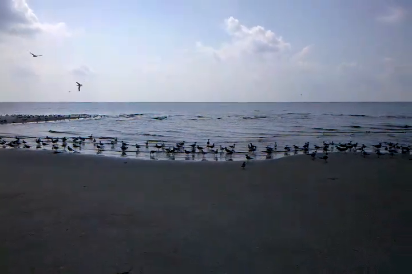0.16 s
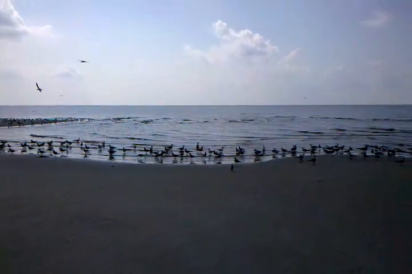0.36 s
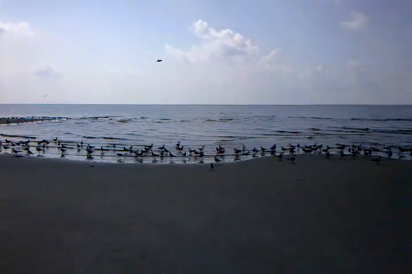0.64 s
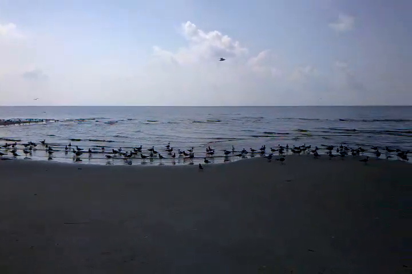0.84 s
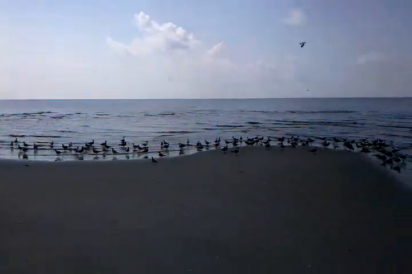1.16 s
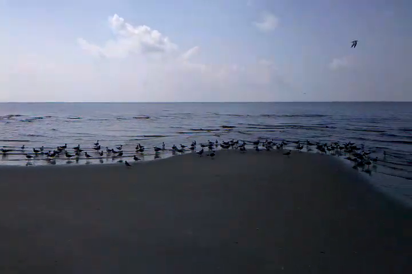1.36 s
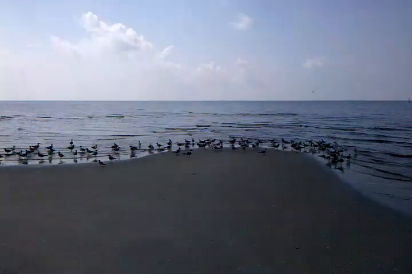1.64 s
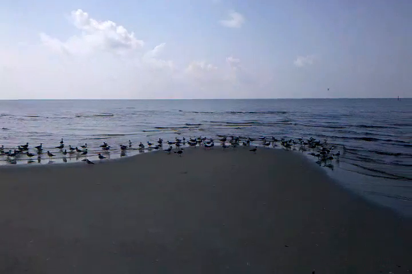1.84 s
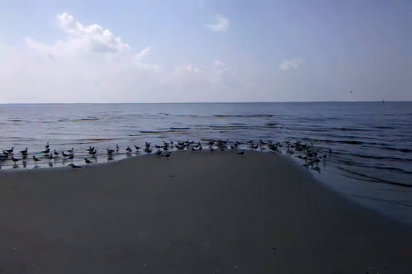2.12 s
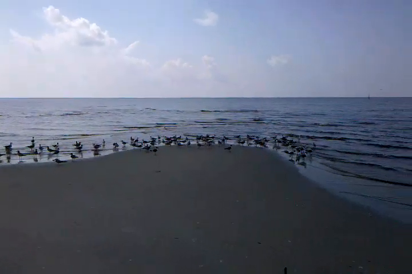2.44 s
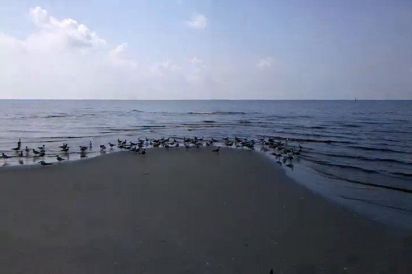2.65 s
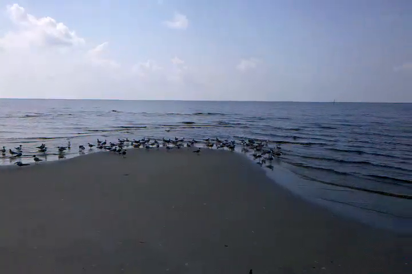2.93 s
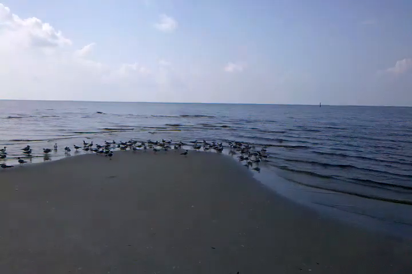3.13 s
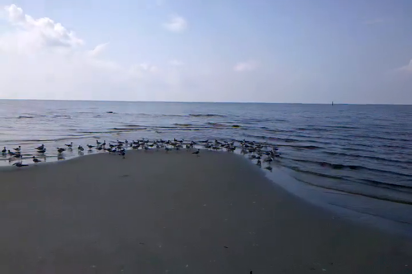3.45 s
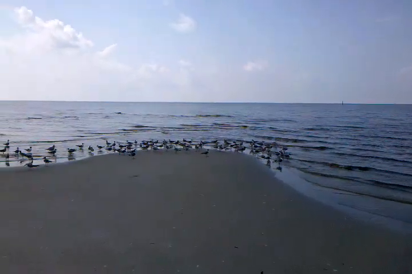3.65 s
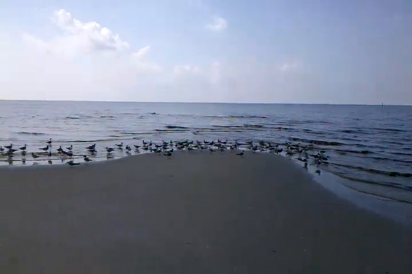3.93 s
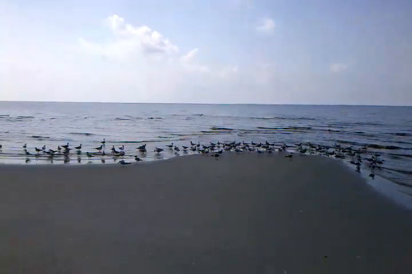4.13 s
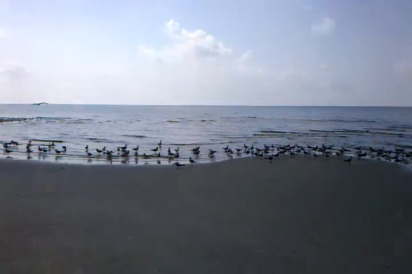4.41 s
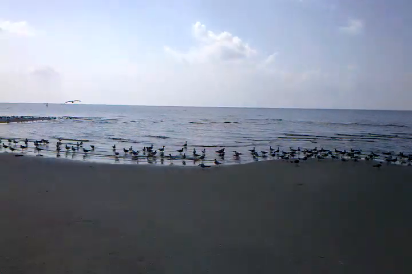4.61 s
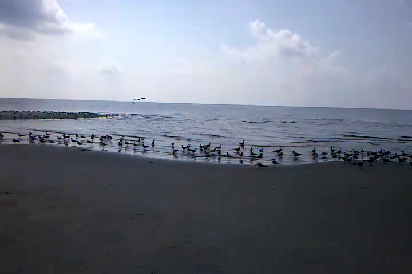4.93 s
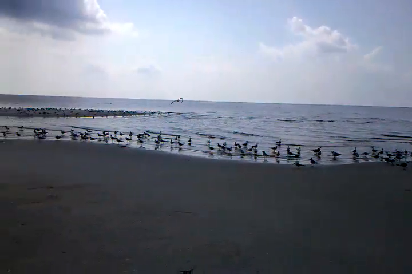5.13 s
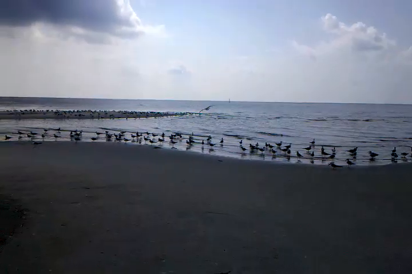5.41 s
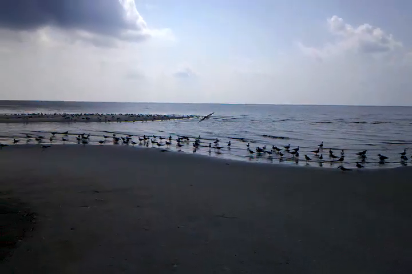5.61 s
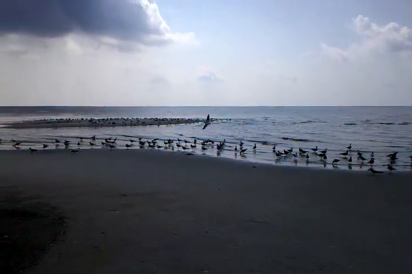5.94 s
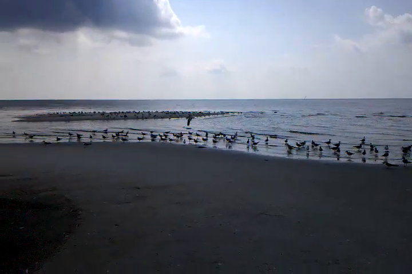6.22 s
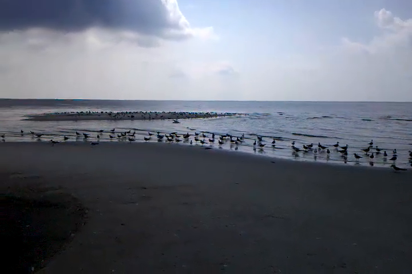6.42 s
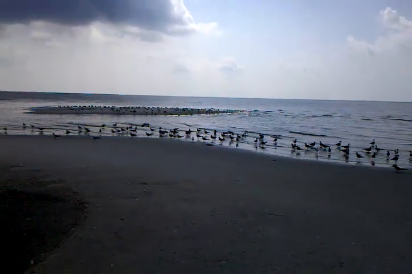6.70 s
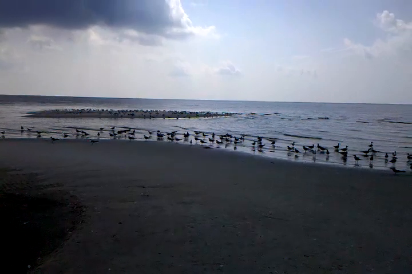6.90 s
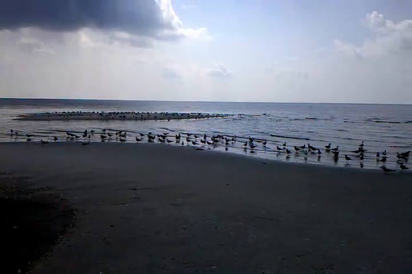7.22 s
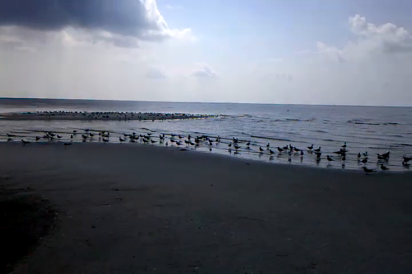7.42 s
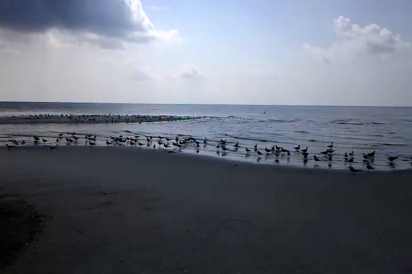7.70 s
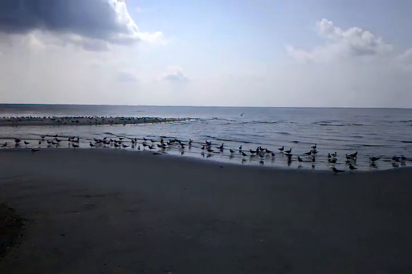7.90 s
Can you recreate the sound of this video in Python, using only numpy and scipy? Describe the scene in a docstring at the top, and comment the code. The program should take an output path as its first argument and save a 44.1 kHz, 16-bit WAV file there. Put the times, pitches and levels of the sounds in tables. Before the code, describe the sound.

Open beach, gulls at the waterline at a modest distance, almost no echo. Small surf hisses softly throughout in flickering bands, with light spray swells near 2.4, 3.9, 4.9 and 7 s. Far birds form a swelling high peeping shimmer. A warbled whistle opens; thin begging whistles that step upward recur roughly every second. Throaty trilled cries come at 1.4, 2.3, 2.7 and, strongly, 3.1 s, with short barks near 2, 3, 4 and 4.4-4.7 s. Dull wind bumps touch the microphone at 1.1-2.3, 3.3 and 4.5-5.2 s. A faint low engine drone, slowly sinking, grows clearer after 4 s. More cries at 4.8 and 5.1 s, then a bright pair at 5.6-5.8 s. From 6 to 7.7 s whistles, peeps and a few barks lead, with a piercing drooping squeak at 7.2 s. At 7.8 s a bark, whistle and loud low-pitched cry crowd together, ending around 8 s.

```python
"""On an open beach, a flock of gulls stands at the waterline, some way from a small camera.
Young birds beg with thin, nearly pure whistles; adults give trilled, throaty cries and short barks,
built from harmonics of a vibrating membrane plus throat-shaped noise, over many short far calls
and a swelling band of noise near 3.9 kHz. Small surf hisses in flickering noise bands, a far boat engine
drones on two harmonics, and a few puffs of wind bump the microphone as short bursts of low noise."""
import sys
import numpy as np
from scipy import signal
from scipy.fft import rfft, irfft, next_fast_len
from scipy.io import wavfile
from scipy.ndimage import uniform_filter1d, map_coordinates

SR = 44100
rng = np.random.default_rng(int(sys.argv[2]) if len(sys.argv) > 2 else 0)


def wrap_up_sound(samples):
    """Save the sound to the file named by the first command line argument, as 16-bit audio."""
    columns = np.atleast_2d(samples).T
    # keep every value between -1 and 1, then stretch to whole-number steps
    tamed = np.clip(columns, -1, 1)
    steps = np.round(tamed * 32767).astype(np.int16)
    wavfile.write(sys.argv[1], SR, steps)


N = 355401


def undb(db):
    """Decibels to amplitude ratio: 20 dB is a factor of ten."""
    return 10 ** (np.asarray(db) / 20)


def unit(x):
    """Normalise to rms 1, so that a later gain sets the level."""
    return x / np.sqrt(np.mean(x ** 2) + 1e-20)


def whole(rows):
    """Linear interpolation of each table column over the whole scene."""
    s, *columns = np.transpose(rows)
    return [np.interp(np.arange(N) / SR, s, c) for c in columns]


def colour(hz, points):
    """Spectral envelope: gain at hz from (hz, db) points, interpolated on a log-frequency axis."""
    f, db = np.transpose(points)
    return undb(np.interp(np.log(hz + 1), np.log(f), db))


def wander(size, rate):
    """Band-limited random modulation: smoothed normal draws, rate of them per second."""
    place = np.arange(size) * rate / SR
    draws = rng.standard_normal(int(place[-1]) + 4)
    return map_coordinates(draws, [place + 1], order=2, mode="nearest")


def noise(size, shape):
    """Filtered white noise of rms 1: its spectrum follows shape(hz)."""
    n = next_fast_len(size)
    spectrum = rfft(rng.standard_normal(n)) * shape(np.arange(n // 2 + 1) * SR / n)
    return unit(irfft(spectrum, n)[:size])


def hump(hz, centre, octaves):
    """Resonance band: a Gaussian bell on the log-frequency axis."""
    return np.exp(-.5 * (np.log2((hz + 1) / centre) / octaves) ** 2)


def fade(size, edge_s):
    """Amplitude gate with cosine edges, which avoid clicks."""
    return signal.windows.tukey(size, min(2 * edge_s * SR / size, 1))


def add(out, start_s, x):
    """Superposition: mix a sound in at its time."""
    i = max(int(start_s * SR), 0)
    out[i:i + len(x)] += x[:max(N - i, 0)]


def clock(length):
    """Time base of a call: seconds since its start."""
    return np.arange(int(max(length, .01) * SR)) / SR


def swells(rows, base_db):
    """Incoherent power addition: bell-shaped swells over a steady base, in dB."""
    t = np.arange(N) / SR
    power = undb(base_db) ** 2
    for middle, length, db in rows:
        power = power + undb(db) ** 2 * np.exp(-np.pi * ((t - middle) / length * 1.24) ** 2)
    return 10 * np.log10(power)


def surf(surf_db, spray_db, wash_db=5.5, fizz_db=-3, flicker_db=1.52):
    """Breaking water as broadband noise: bands swell together and flicker alone, with fine spray on top."""
    # spectral density of the wash: hz, relative_db (per hz)
    wash_shape = [(30, -33.5), (60, -10.5), (110, 3.5), (230, 0.5), (430, -3.5), (780, 1.5), (1250, -1.5),
                  (1700, 0), (2250, -1.5), (2850, -10.5), (3800, -8), (4700, -13.5), (6800, -18),
                  (8000, -44.5)]
    wash = np.zeros(N)
    for centre in 40 * 2 ** np.arange(0, 8, .5):
        band = noise(N, lambda f: hump(f, centre, .28) * colour(f, wash_shape))
        # a band's power grows with its width, hence the root of its centre
        band_gain = colour(centre, wash_shape) * np.sqrt(centre)
        wash += band * band_gain * undb(flicker_db * wander(N, 14))
    spray = noise(N, lambda f: hump(f, 5500, .35))
    return unit(wash) * undb(surf_db + wash_db) + spray * undb(spray_db + fizz_db)


def boat(gain_db=2, second_db=-19):
    """Periodic combustion: a far engine's low, slowly sinking firing note and its second harmonic."""
    # engine track: time_s, firing_rate_hz, level_db (before gain_db and a random wavering)
    engine = [(0, 104.7, -67), (2.0, 103.9, -65), (3.95, 101.6, -61.5), (4.25, 101.4, -58.5),
              (5.12, 99.2, -58), (6.45, 98.84, -58.5), (8.06, 96.7, -62.5)]
    hz, db = whole(engine)
    phase = 2 * np.pi * np.cumsum(hz) / SR
    tone = np.sqrt(2) * (np.sin(phase) + undb(second_db) * np.sin(2 * phase))
    return tone * undb(db + gain_db + 1.4 * wander(N, 11))


def syrinx(hz, gains, rough, jitter=0.052, flutter=0.65, rattle_hz=185, rattle=0.61):
    """Harmonics of a vibrating membrane; roughness makes its period uneven and breaks it into a rattle."""
    n = len(hz)
    rough = np.clip(rough, 0, 1)
    phase = 2 * np.pi * np.cumsum(hz * (1 + jitter * rough * wander(n, 1400))) / SR
    slaps = np.cos(2 * np.pi * np.cumsum(rattle_hz * (1 + .3 * wander(n, 120))) / SR)
    swing = (1 + rough * rattle * slaps) / (1 + rough ** 2 / 2)
    voice = np.zeros(n)
    for k, gain in enumerate(gains, 1):
        strength = gain * (1 + flutter * rough * wander(n, 900))
        voice = voice + strength * np.sin(k * phase + rng.uniform(0, 2 * np.pi))
    return swing * voice * np.sqrt(2)


def whistle(hz, overtone_db=-14, dull_db=-20):
    """A nearly sinusoidal, slightly quavering tone; the higher it is, the weaker its one overtone."""
    n = len(hz)
    hz = uniform_filter1d(hz, 200, mode="nearest") * (1 + .0022 * wander(n, 160))
    # overtone_db holds at 2800 Hz and changes by dull_db per octave
    overtone = undb(overtone_db + dull_db * np.log2(hz / 2800))
    return syrinx(hz, [1, overtone], rough=.03) * undb(wander(n, 60)) * fade(n, .004)


def far_calls_and_band(swell_db, peeps_db=-9, squawks_db=-65, band_db=-3, count=260):
    """Superposition at random times: far falling peeps and hoarse squawks, plus a noise band near 3.9 kHz."""
    peeps, squawks = np.zeros(N), np.zeros(N)
    for when, length, pitch, slide, size in rng.random((count, 5)):
        arc = np.linspace(0, 1, int((.03 + .05 * length) * SR))
        hz = (3850 + 550 * pitch) * (1 - 0.13 * slide * arc ** 2)
        add(peeps, when * N / SR, whistle(hz) * np.sin(np.pi * arc) * undb(-10 * size))
    for when, length, pitch, size in rng.random((count, 4)):
        arc = np.linspace(0, 1, int((.05 + .12 * length) * SR))
        hz = (780 + 400 * pitch) * (1 + .08 * np.sin(np.pi * arc) - .1 * arc)
        squawk = syrinx(hz, [.3, 1, .15], rough=0.97) * np.sin(np.pi * arc)
        add(squawks, when * N / SR, squawk * undb(-8 * size))
    band = noise(N, lambda f: hump(f, 3870, 0.14))
    swelling = unit(peeps) * undb(peeps_db) + band * undb(band_db)
    return swelling * undb(swell_db) + unit(squawks) * undb(squawks_db)


def warble(length, first_hz, last_hz, first_db, last_db, swing, rate):
    """Frequency modulation: a peep whose pitch swings quickly, with level moving against pitch."""
    n = int(length * SR)
    beat = np.cos(2 * np.pi * np.cumsum(rate * (1 + 0.076 * wander(n, 20))) / SR)
    hz = np.linspace(first_hz, last_hz, n) * (1 + swing * beat)
    return whistle(hz) * undb(np.linspace(first_db, last_db, n) - 69 * swing * beat)


def squeak(length, pitch):
    """Decaying high-register tone: it starts at its strongest, then droops in pitch and fades."""
    fall_per_s, fade_db_per_s = .38, 62  # the mean droop as a share of pitch per s, and the fade
    t = clock(length)
    return whistle(pitch * (1 - fall_per_s * t ** 2 / length)) * undb(-fade_db_per_s * t)


def glide(length, pitch, change, bend, ends_db=5):
    """Accelerating glissando: a short note slides ever faster from its pitch, loudest in the middle."""
    u = clock(length) / length
    return whistle(pitch * (1 + change * u ** bend)) * undb(-ends_db * (2 * u - 1) ** 2)


def beg(length, pitch, climb, climb_at):
    """Sigmoid pitch step: a held whistle climbs and thins, then fades and, if it lasts, sags."""
    climb_s, thin_db, fade_db_per_s = 0.019, 5.5, 55.5
    attack_s, attack_db = 0.013, 8
    sag_after_s, sag_per_s2 = .19, 6.5  # the sag is a share of pitch per s squared
    t = clock(length)
    risen = 1 / (1 + np.exp((climb_at - t) / climb_s))
    hz = pitch * (1 + climb * risen - sag_per_s2 * np.maximum(t - sag_after_s, 0) ** 2)
    attack = attack_db * np.exp(-t / attack_s)
    db = -attack - thin_db * risen - fade_db_per_s * np.maximum(t - climb_at, 0)
    return whistle(hz) * undb(db)


def wind(rumble_db=-13):
    """Turbulent pressure: eddies push on the microphone with dull thumps over a little rumble."""
    # wind bumps: start_s, length_s, centre_hz, level_db
    puffs = [(1.12, 0.036, 150.3, -55), (1.394, 0.057, 154, -46.5), (1.958, 0.068, 128, -56.5),
             (2.25, .22, 130, -61.5), (3.25, 0.15, 85, -60.5), (4.52, 0.058, 217, -51.5),
             (4.712, 0.024, 235, -44.5), (4.719, 0.098, 180, -52), (4.86, 0.065, 142, -51.5),
             (4.94, 0.073, 131, -57), (5.124, 0.07, 190, -54)]
    out = np.zeros(N)
    for start, length, hz, db in puffs:
        n = int(length * SR)
        eddy = noise(n, lambda f: hump(f, hz, 0.51) + undb(rumble_db) * hump(f, 66, 1.0))
        add(out, start, unit(eddy * fade(n, length / 3)) * undb(db))
    return out


def syllable(place, share, droop=.45):
    """Airway gating along one trill cycle (place 0-1): it snaps open, droops and closes."""
    opening = np.sin(np.pi / 2 * np.clip(place / .06, 0, 1)) ** 2
    closing = (1 - np.tanh((place - share) / .07)) / 2
    return opening * (1 - droop * place) * closing


def gesture(timing, pitches, levels, roughs):
    """Coupled contours of pitch, level and roughness: scoop, crest, dip, second crest, fall."""
    scoop_share, scoop_db, dip_flatness = .08, 8, 1.6  # start below the crest; breadth of the dip
    fall_s, fall_share, fall_db = .055, .17, 8  # pitch share and level lost in fall_s after the second crest
    start, crest, dip, second, end = timing
    t = clock(end)
    height = np.sin(np.pi / 2 * np.interp(t, [crest, dip, second], [1, 0, 1])) ** (2 * dip_flatness)

    def contour(first, low, last):
        return low + (np.where(t < dip, first, last) - low) * height

    scoop = np.clip(1 - t / crest, 0, 1)
    fall = (np.maximum(t - second, 0) / fall_s) ** 1.5
    hz = contour(*pitches) * (1 - scoop_share * scoop ** 2 - fall_share * fall)
    db = contour(*levels) - scoop_db * scoop - fall_db * fall ** 2
    edges = np.minimum(scoop + fall ** 1.5, 1)
    return start + t, hz, db, contour(*roughs), edges


def cry(timing, pitches, levels, tone, trill, sag=.055, lag=0.23, hoarse=0.49, base_rough=0.03,
        throat_db=24, rasp_db=-9, quaver=.018):
    """Source and filter, led by the second harmonic; the trill gates it into sagging, hoarse-ended syllables."""
    # throat resonances for the overtones: hz, gain_db
    cry_throat = [(2300, -5.5), (2600, 0.5), (2900, -13.5), (3150, -18), (3450, -13), (4100, -14),
                  (4650, -21), (5300, -19), (6300, -30), (8000, -41)]
    edge_rough, edge_third_db = .7, 4  # both grow at the hoarse start and end
    trill_depth, trill_stop_s = .93, .06
    *roughs, fundamental_db, third_db, upper_db = tone
    t, hz, db, rough, edges = gesture(timing, pitches, levels, roughs)
    n = len(t)
    middle, rate, share, trill_s = trill
    depth = trill_depth * np.clip((t[0] + trill_s - t) / trill_stop_s, 0, 1)
    place = (rate * (t - middle) + share / 2 + .02 * wander(n, 25)) % 1
    rough = np.clip(base_rough + rough + edge_rough * edges + hoarse * depth * place ** 2, 0, 1)
    hz = hz * (1 + quaver * rough * wander(n, 110))
    # the third harmonic sounds late in each syllable
    early = 1 - depth * (1 - syllable(place, share))
    late = 1 - depth * (1 - syllable((place - lag) % 1, share))
    upper = []
    for k, drop_db in enumerate((0, -2, -8), 4):
        strength = undb(upper_db + drop_db + 4 * wander(n, 90))
        upper.append(colour(k * hz, cry_throat) * strength * early)
    # the throat lets more of the fundamental out as the pitch climbs (throat_db per octave)
    fundamental = undb(fundamental_db + throat_db * np.log2(hz / hz.mean()))
    third = colour(3 * hz, cry_throat) * undb(third_db + edge_third_db * edges)
    sagging_hz = hz * (1 + sag * depth * (share / 2 - place))
    voice = syrinx(sagging_hz, [fundamental * early, early, third * late] + upper, rough)
    # where the voice breaks up, a rasp fills the gaps between the harmonics
    rasp = noise(n, lambda f: hump(f, 2.0 * hz.mean(), .45)) * rough * (early + late) / 2
    level = undb(db + depth * (1.5 + wander(n, 30)))
    return (voice + undb(rasp_db) * rasp) * level * fade(n, 0.0023)


def bark(length, pitch, rough, rise, rasp_db=-9):
    """Fixed throat resonances filter a low, hoarse, slightly rising 'kek', raspiest at its start."""
    # throat resonances: hz, gain_db
    bark_throat = [(500, -25.5), (1050, -11), (1550, 4), (2100, -2), (2600, -3), (3200, -8), (4200, -12.5),
                   (6500, -21), (8000, -44)]
    n = int(length * SR)
    hz = pitch * (1 + rise * np.linspace(-1, .5, n))
    gains = [colour(k * hz, bark_throat) for k in range(1, 14)]
    voice = unit(syrinx(hz, gains, rough * np.linspace(1.4, .6, n)))
    rasp = noise(n, lambda f: colour(f, bark_throat) * hump(f, 2500, 1)) * np.linspace(1, .5, n)
    return (voice + undb(rasp_db) * rasp) * fade(n, .01)


def hiss(length=0.03):
    """Band-limited noise: a brief high hiss."""
    n = int(length * SR)
    return noise(n, lambda f: hump(f, 6150, .19)) * fade(n, .012)


def near_birds(peep_db=1, hiss_db=-50):
    """Superposition of the calls of the birds at the waterline and a brief hiss."""
    # warbled whistles: start_s, length_s, first_pitch_hz, last_pitch_hz, first_level_db, last_level_db
    # (before the swing in level), swing (share of pitch), swing_rate_hz
    warbles = [(.004, 0.11, 4020, 4040, -52, -59, 0.062, 38),
               (2.323, 0.35, 4336, 4180, -54.5, -58.5, .026, 32.5),
               (3.12, .27, 3830, 3820, -58, -57, .008, 24), (4.82, 0.33, 4280, 3870, -57, -65, 0.026, 47)]
    # squeaks, where the voice flips into its high register: start_s, length_s, pitch_hz, level_db (at the start)
    squeaks = [(0.12, .035, 5270, -67), (.255, .045, 5250, -67), (1.35, .07, 4840, -66),
               (2.086, 0.15, 5000, -52), (6.478, 0.11, 5160, -55.5), (7.161, .185, 4955, -45.5),
               (7.946, 0.11, 5070, -57)]
    # sliding peeps, mostly falling: start_s, length_s, pitch_hz, level_db (before peep_db), fall (share of pitch)
    peeps = [(.125, .035, 4350, -61.5, .01), (1.27, .07, 4220, -63, 0), (1.585, 0.039, 3950, -59, .1),
             (1.726, 0.031, 3900, -54.5, .09), (2.008, .025, 3780, -56, 0.098),
             (2.112, .025, 3820, -56.5, .09), (2.272, 0.033, 3920, -58.5, .1),
             (2.275, 0.051, 4540, -58, 0.015), (3.048, .048, 4340, -58.5, 0.002),
             (3.175, .05, 4380, -57, .02), (4.46, .035, 3970, -61.5, .01), (4.554, .037, 4310, -61, .03),
             (4.961, 0.18, 3625, -60.5, 0.039), (6.262, .028, 4280, -59, .045),
             (6.573, .05, 4320, -54.5, .09), (6.737, 0.033, 4410, -56, .14), (6.82, .038, 4750, -57.5, 0.2),
             (7.335, .028, 4720, -51, .035), (7.361, 0.033, 4040, -51.5, 0.029),
             (7.589, 0.028, 4640, -59.5, 0.047), (7.737, .028, 4700, -61, .05),
             (7.776, 0.019, 4400, -55, -.05)]
    # begging whistles of young birds: start_s, length_s, pitch_hz (before the climb),
    # level_db (before attack, thinning and fade), climb (share of pitch), mid_climb_s (from the start)
    begs = [(0.277, 0.26, 4035, -53, 0.067, 0.1), (1.159, .18, 3930, -60, .085, .095),
            (1.948, .137, 3915, -50.5, .12, 0.1), (2.854, 0.16, 3945, -46.5, .085, .125),
            (3.886, .19, 3925, -49, 0.073, 0.088), (4.691, .31, 3960, -48.5, 0.1, 0.077),
            (5.538, .295, 3990, -44.5, .1, .105), (6.287, 0.19, 4137, -44, .075, .11),
            (7.032, 0.14, 3980, -43, 0.18, .124), (7.801, 0.16, 4040, -46.5, 0.094, 0.094)]
    # throaty cries, five groups a row: timing (start_s, then from there first_crest_s, dip_s, second_crest_s,
    # end_s), pitch_hz and level_db (crest, dip, crest; before quaver, sag and trill),
    # tone (added roughness 0-1 at crest, dip, crest, then fundamental_db, third_db, upper_db),
    # trill (middle_s of one syllable, rate_hz of syllables, open_share 0-1, lasting_s from the start)
    cries = [ ((1.378, .04, .168, .294, .332), (1160, 842, 1030), (-43, -45, -45.5),
             (.05, .3, .45, -12, 1, -2), (1.531, 33.8, .6, .29)), ((2.33, 0.018, .17, .345, .362),
             (1100, 1040, 1030), (-58, -50, -43), (.25, .4, .15, -12, 0, 0), (2.5635, 17.6, .32, .42)),
             ((2.729, .008, .13, .205, .225), (1340, 1262, 1245), (-52, -51, -59),
             (.03, .08, .3, -19, 1, 8), (2.816, 38.3, .6, .3)), ((3.063, .046, .185, .305, .35),
             (1172, 860, 1055), (-39.5, -44.5, -44.5), (.03, .2, .45, -29.5, -10, -3),
             (3.133, 33.2, .64, .295)), ((4.812, 0.0297, .13, .31, .325), (955, 982, 998),
             (-50, -49, -51.5), (.6, .35, .5, -26, 8, 5), (4.944, 23.3, .48, .4)),
             ((5.14, .006, .012, .018, .048), (900, 885, 870), (-54, -53, -54), (.15, .15, .2, -20, 6, 0),
             (5.15, 23.3, .5, 0)), ((5.611, .034, .068, .121, .133), (1270, 1160, 1216), (-42, -41.5, -39),
             (.12, .58, .03, -19, 9, 3), (5.6795, 34.4, .53, .2)), ((5.745, .004, .012, .022, .067),
             (1315, 1295, 1270), (-44, -43, -41), (0, 0, .06, -19, 2, 4), (5.77, 33, .5, 0)),
             ((7.82, .008, .058, .158, .22), (905, 772, 850), (-36.5, -41.5, -42),
             (0, 0, 0, -19, -2.5, -11), (7.9, 33, .3, 0))]
    # short barks: start_s, length_s, pitch_hz (two thirds of the way), level_db (before the rasp),
    # roughness (before it slackens along the bark), rise (share of pitch)
    barks = [(2.047, .059, 522, -48, .35, .08), (2.164, .076, 562, -51, .75, .08),
             (2.968, .049, 517, -47, .06, .06), (4, .037, 625, -54, .7, .08),
             (4.371, 0.078, 571, -56.5, .48, .08), (4.649, .057, 561, -49, .85, .08),
             (4.699, .03, 615, -51, .3, .08), (6.311, .073, 673, -55.5, 1.1, .08),
             (6.595, .065, 601, -53.5, .83, .08), (6.841, .045, 519, -47.5, .36, .08),
             (7.795, .03, 655, -41.5, .1, .19)]
    # low-register chirps that hook upward: start_s, length_s, pitch_hz, level_db, rise (share of pitch)
    chirps = [(2.102, 0.067, 2680, -52.5, .16), (3.011, 0.064, 2755, -46.5, .04),
              (3.865, .024, 2790, -57, .08), (6.885, .058, 2735, -56.5, .04),
              (7.01, .024, 2760, -56.5, 0.1), (7.775, .026, 2980, -57, .09)]
    out = np.zeros(N)
    for start, *shape in warbles:
        add(out, start, warble(*shape))
    for start, length, pitch, db in squeaks:
        add(out, start, squeak(length, pitch) * undb(db))
    for start, length, pitch, db, fall in peeps:
        add(out, start, glide(length, pitch, -fall, bend=1.4) * undb(db + peep_db))
    for start, length, pitch, db, climb, climb_at in begs:
        add(out, start, beg(length, pitch, climb, climb_at) * undb(db))
    for timing, *shape in cries:
        add(out, timing[0], cry(timing, *shape))
    for start, length, pitch, db, rough, rise in barks:
        add(out, start, bark(length, pitch, rough, rise) * undb(db))
    for start, length, pitch, db, rise in chirps:
        add(out, start, glide(length, pitch, rise, bend=2.6) * undb(db))
    add(out, 7.893, hiss() * undb(hiss_db))  # during the last cry
    return out


def scatter(x, scatter_db=-19, t60=0.18):
    """Diffuse reflection: sand and ripples throw back a faint tail that decays 60 dB in t60 seconds."""
    t = np.arange(SR // 2) / SR
    tail = rng.standard_normal(len(t)) * np.exp(-np.log(1000) * t / t60)
    return x + undb(scatter_db) * signal.fftconvolve(x, tail / np.linalg.norm(tail))[:N]


def scene():
    """Linear superposition of sea, boat, birds, noise band and wind at one microphone."""
    # surf: time_s, level_db (before the wash gain)
    swell = [(0, -59), (.55, -60), (2.2, -58.5), (4.6, -58.5), (6.15, -61), (7.0, -61.5), (8.06, -60)]
    # wavelets that break into spray: middle_s, length_s (nominal), level_db (before the fizz gain)
    wavelets = [(.03, .25, -71), (2.35, 0.54, -68), (3.85, 0.27, -68.5), (4.92, 0.49, -65.5),
                (7.05, 0.47, -68), (8, .4, -67.5)]
    # swells of the far peeps and of the noise band near 3.9 kHz:
    # middle_s, length_s (nominal), level_db (before the gains of the peeps and the band)
    peep_and_band_swells = [(.15, 0.38, -59.5), (.93, 0.23, -59), (1.42, .45, -59.5), (2.45, 1, -60.5),
                            (3.7, .5, -62), (4.92, 0.77, -57.5), (5.7, 0.55, -59.5), (6.52, 0.33, -56.5),
                            (7.32, 0.4, -58), (7.8, 0.57, -62.5)]
    surf_db, = whole(swell)
    sea = surf(surf_db, swells(wavelets, base_db=-72.5))
    far = far_calls_and_band(swells(peep_and_band_swells, base_db=-72))
    return (sea + boat() + far + scatter(near_birds()) + wind())[None]


def record(dry):
    """Band limiting: the small camera thins the bass below 65 Hz and cuts the top above 7150 Hz."""
    thin = signal.sosfilt(signal.butter(3, 65, "high", fs=SR, output="sos"), dry)
    return signal.sosfilt(signal.butter(18, 7150, fs=SR, output="sos"), thin)


dry = scene()
out = record(dry)
wrap_up_sound(out)
```